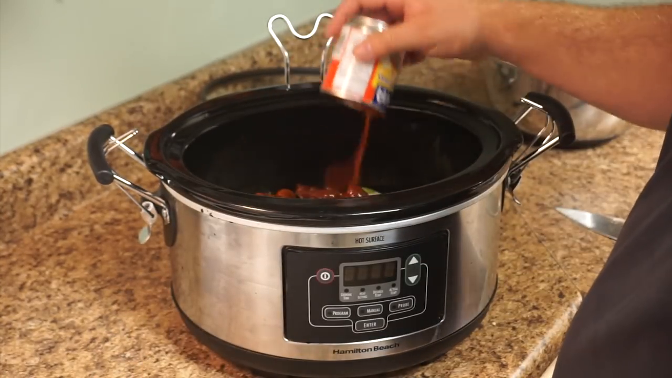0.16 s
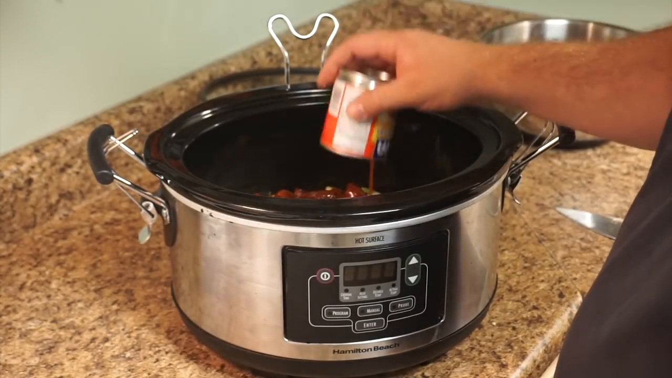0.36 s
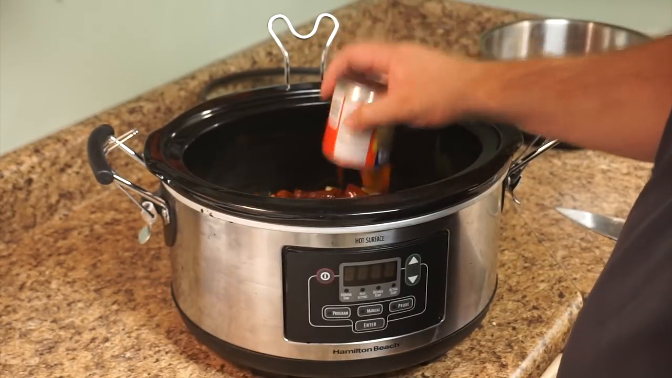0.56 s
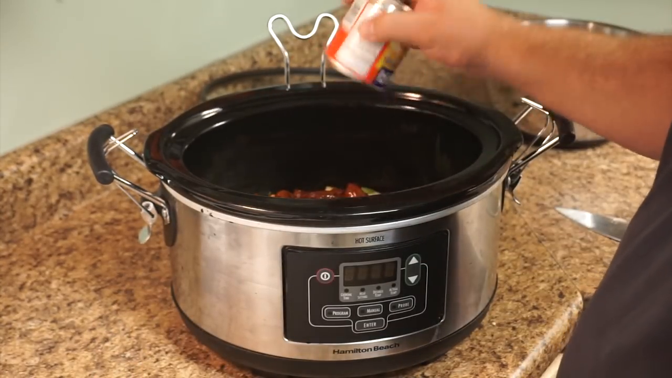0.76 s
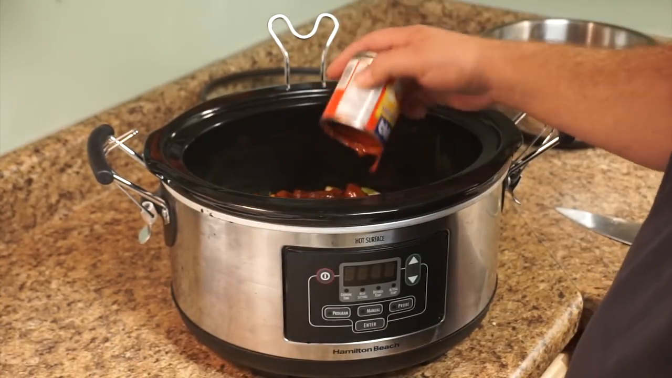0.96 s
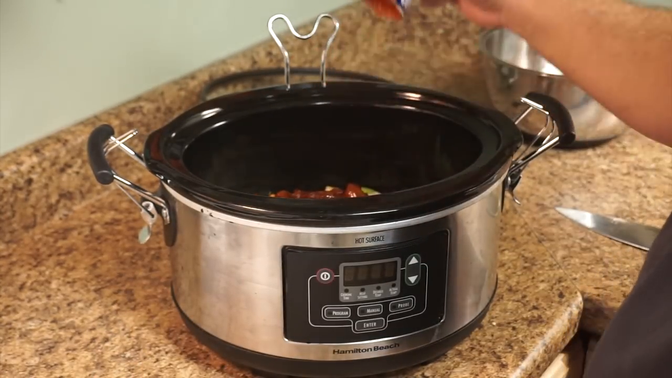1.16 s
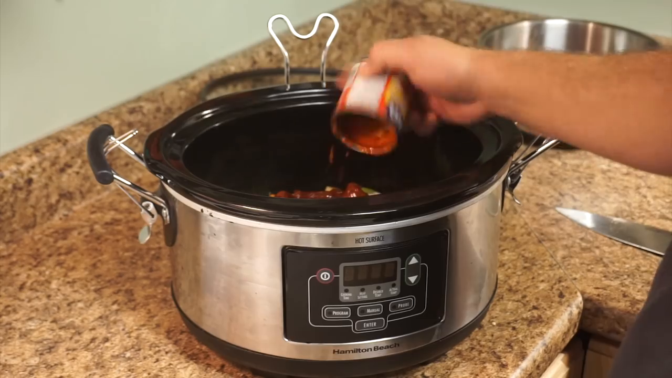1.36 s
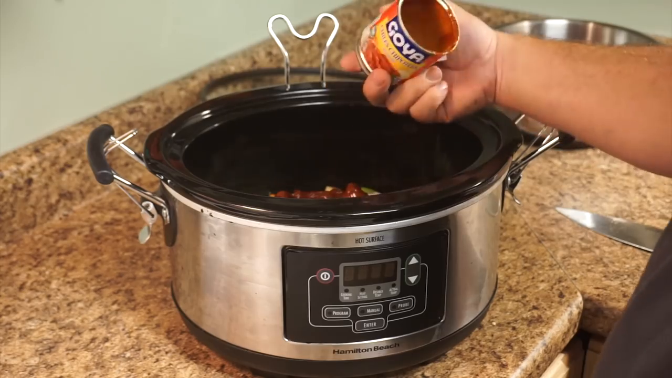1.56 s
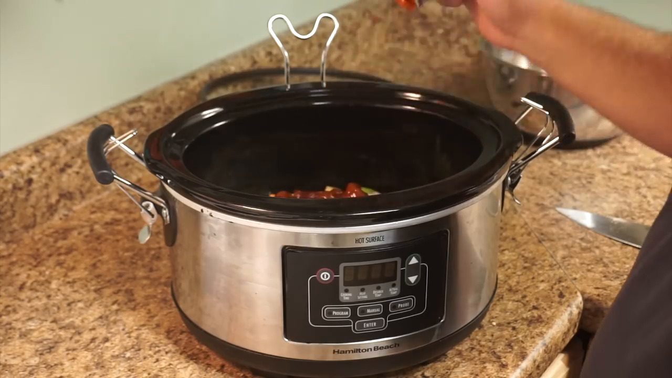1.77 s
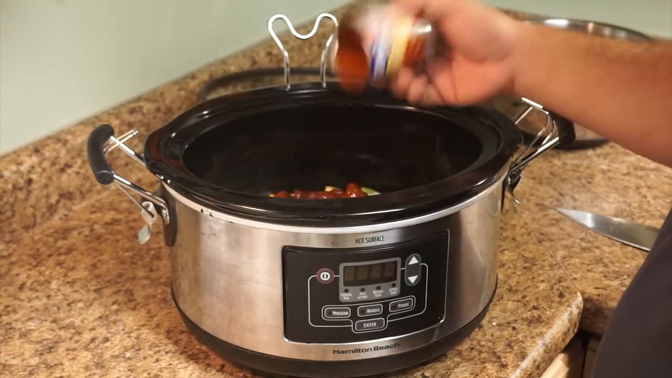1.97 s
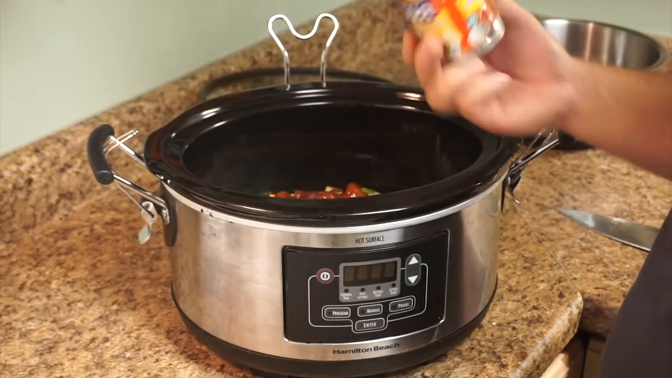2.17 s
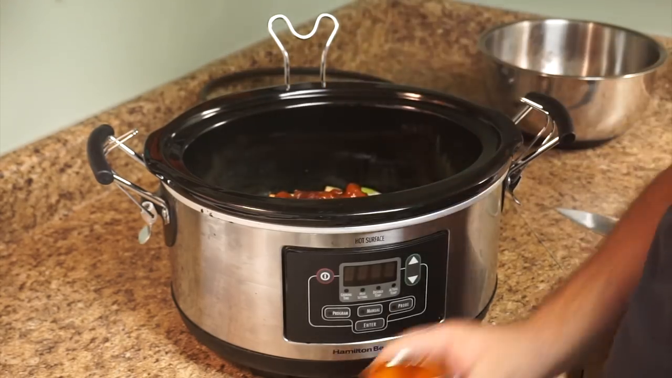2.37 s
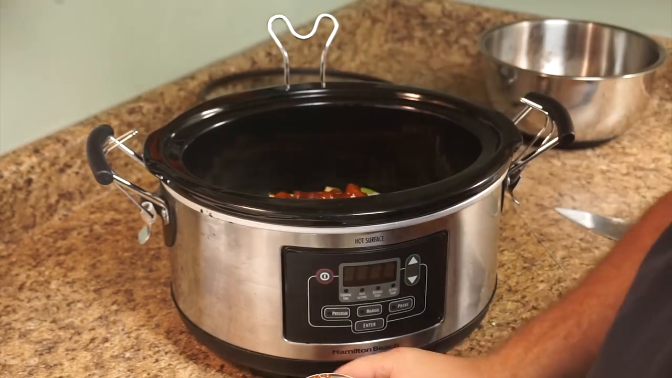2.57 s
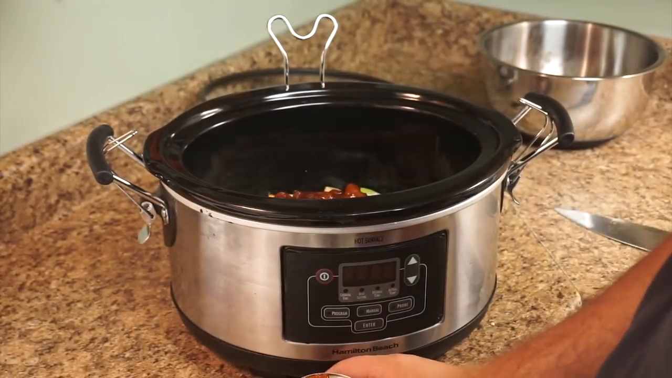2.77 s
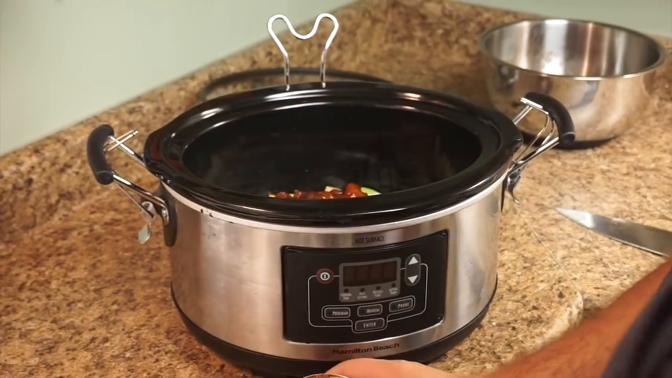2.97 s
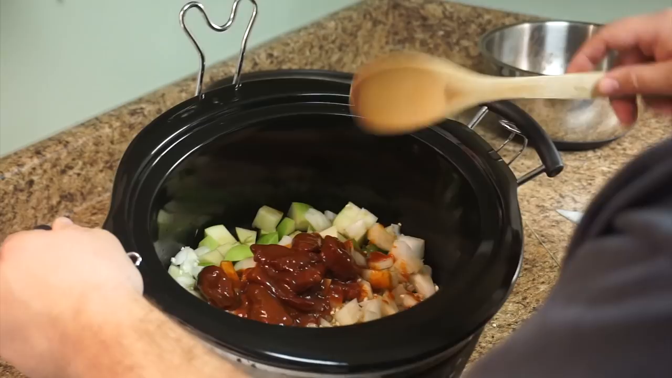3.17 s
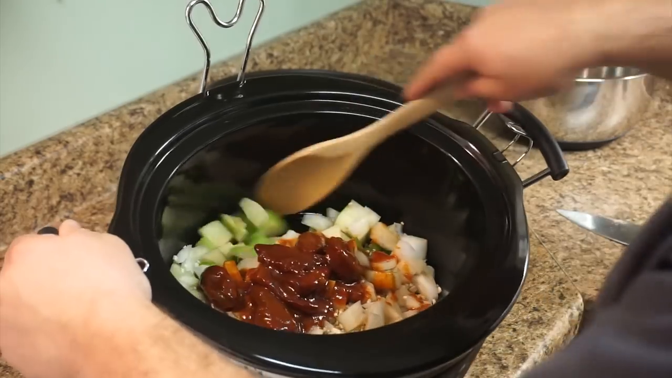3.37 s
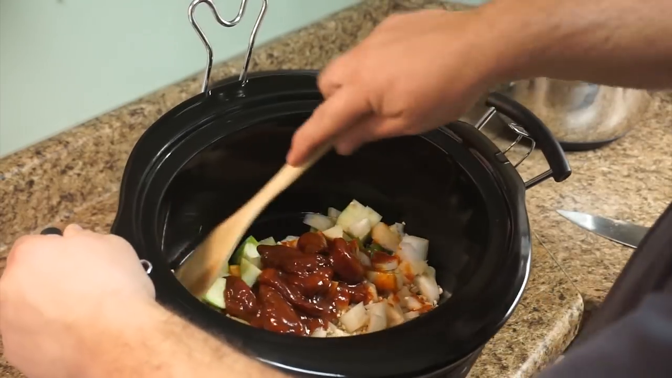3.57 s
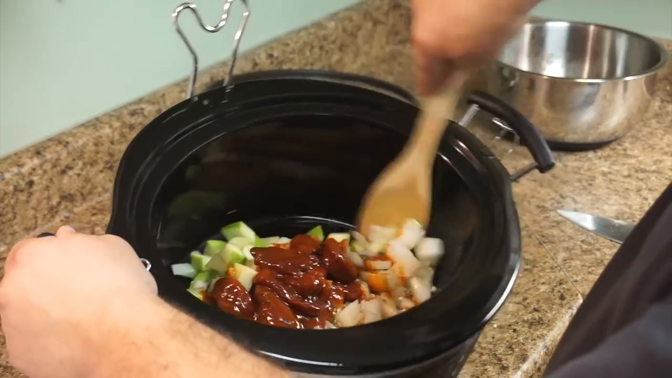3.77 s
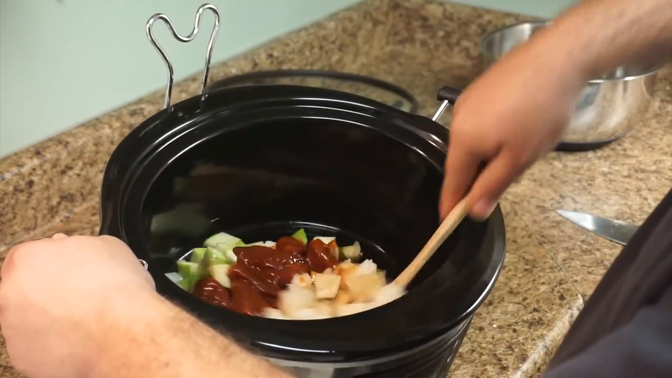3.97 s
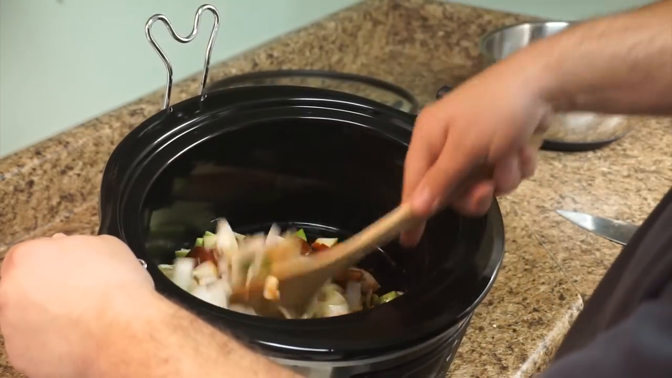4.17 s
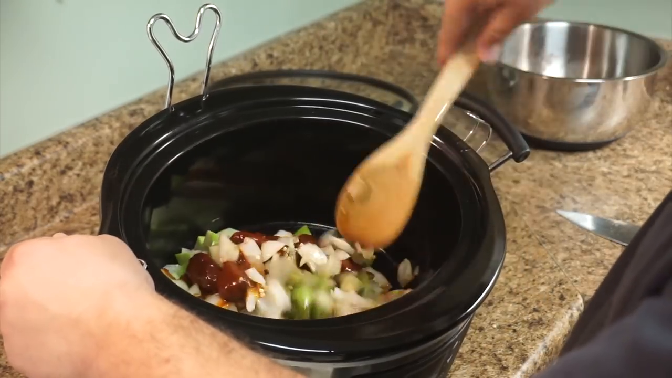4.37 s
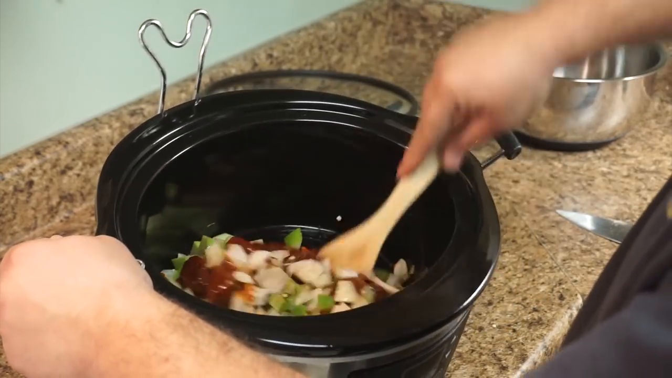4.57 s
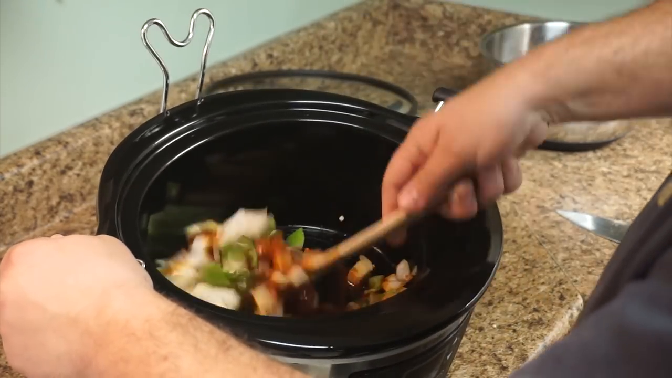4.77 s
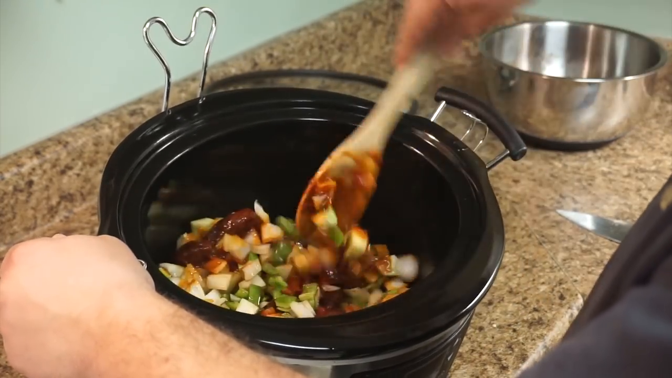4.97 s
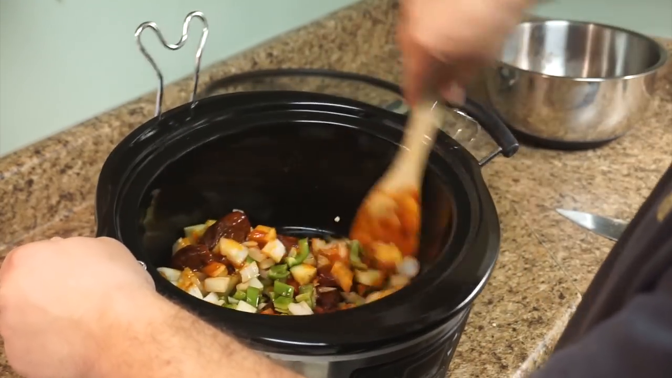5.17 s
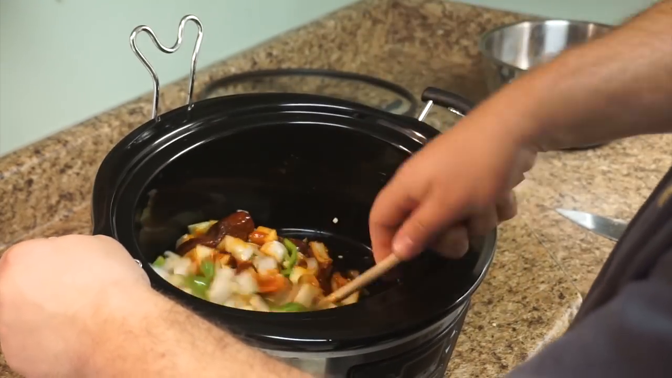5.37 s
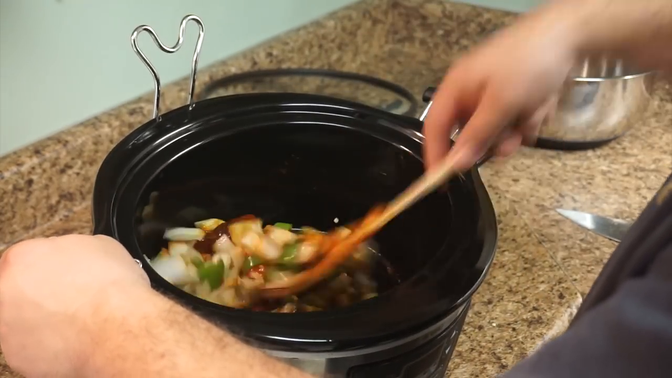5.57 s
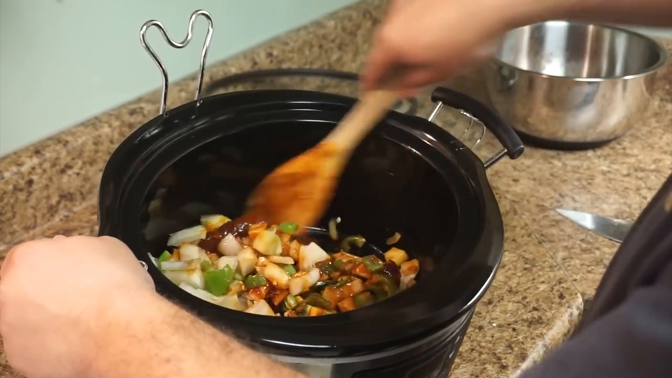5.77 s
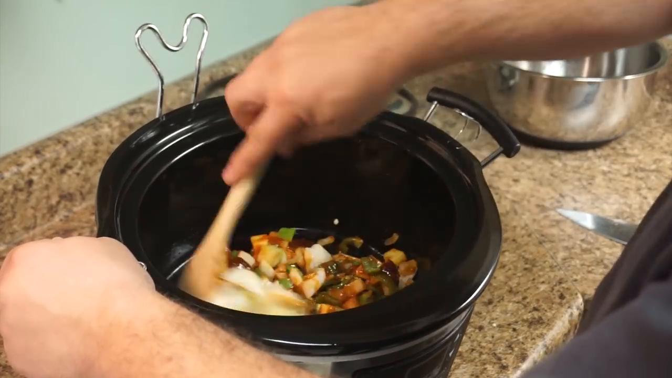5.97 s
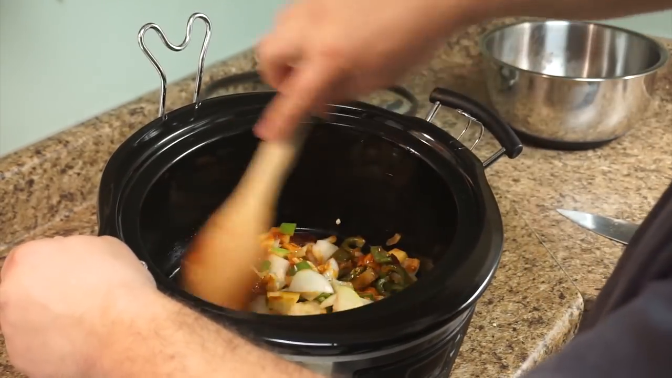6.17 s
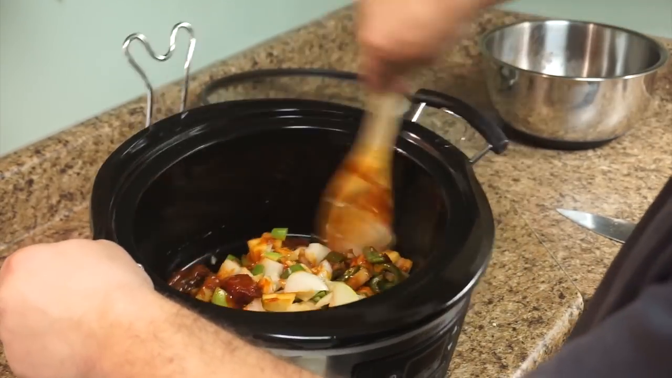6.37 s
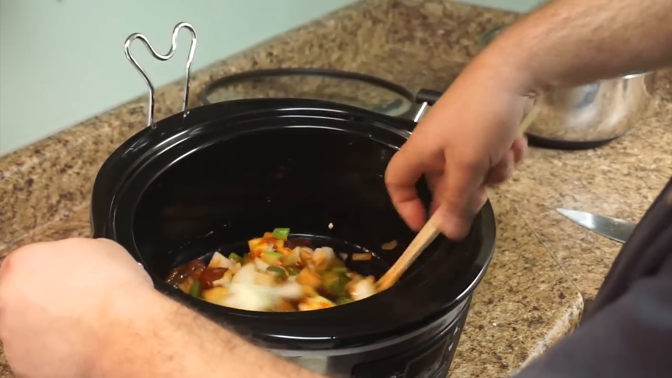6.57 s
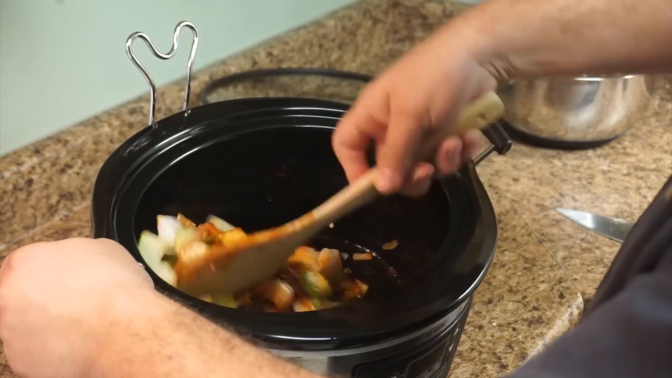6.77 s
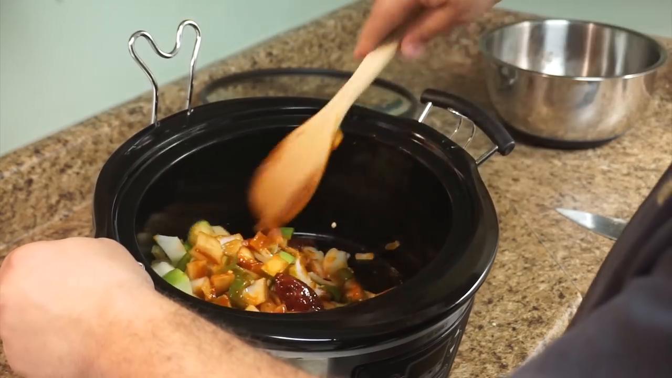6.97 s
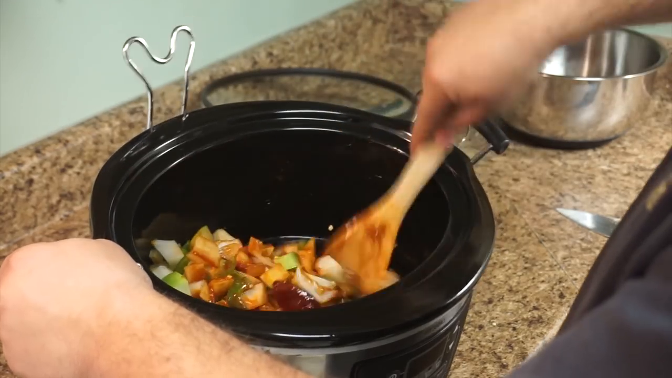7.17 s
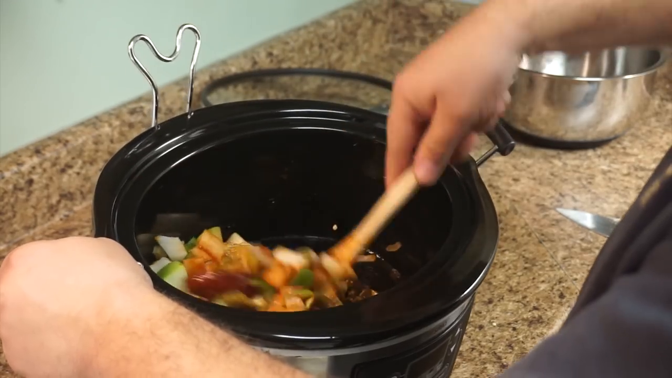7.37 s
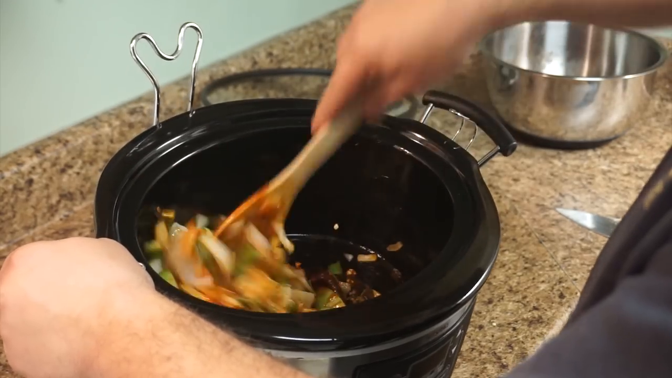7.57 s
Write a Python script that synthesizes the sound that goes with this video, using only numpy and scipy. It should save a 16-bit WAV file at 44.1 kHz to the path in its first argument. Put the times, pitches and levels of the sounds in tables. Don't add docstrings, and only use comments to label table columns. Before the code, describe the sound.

Soft rustles and a tin clank on a stone counter, then a wooden spoon knocks, scrapes and stirs wet vegetables in a stoneware pot.

```python
import sys
import numpy as np
from scipy import signal
from scipy.fft import rfft, irfft, next_fast_len
from scipy.io import wavfile
from scipy.ndimage import uniform_filter1d, map_coordinates

SR = 44100
rng = np.random.default_rng(int(sys.argv[2]) if len(sys.argv) > 2 else 0)


def digitize_waveform(pressure):
    field = np.atleast_2d(pressure).T
    bounded = np.clip(field, -1, 1)
    quanta = np.round(bounded * 32767).astype(np.int16)
    wavfile.write(sys.argv[1], SR, quanta)


def to_linear_factor(level_db):
    exponent = np.asarray(level_db, float) / 20
    return 10 ** exponent


N = 336483

# start in seconds, peak level in dB,
# pitch of the wood in Hz, pitch of the glaze in Hz, level of the bright edge in dB.
RIM_BLOWS = [
    (3.361, -16.5, 2350, 5630, -1),
    (3.855, -20.5, 1150, 4780, -1),
    (4.4582, -13.5, 1400, 5960, -1.5),
    (5.112, -12, 1670, 3900, -8.5),
    (5.742, -17.5, 2550, 3660, -2.5),
    (6.269, -6, 2050, 5480, -19),
    (6.4083, -10, 1670, 7060, -11.5),
    (7.0584, -11, 1420, 4600, -14),
]
# start in seconds, peak level in dB,
# pitch of the wood in Hz, level of the wood in dB, pitch of the glaze in Hz.
FLAT_BLOWS = [(3.666, -19.5, 1430, -5.5, 2580), (3.8334, -19.5, 1200, -17, 4480),
              (4.5084, -8, 1300, -14.5, 2790), (5.147, -12, 975, -14.5, 4100),
              (5.1866, -11, 1800, -4, 6780), (5.291, -23, 2420, -16, 2800),
              (5.306, -21.5, 2140, -9.5, 7400), (5.7947, -8.5, 910, -22, 4000),
              (6.0551, -22.5, 2050, -9.5, 5300), (6.3068, -15, 928, -13, 2900),
              (6.3222, -18.5, 1000, -22, 5800), (6.4588, -33, 2050, 3, 2470), (7.1357, -7, 1156, -19, 3760)]
# pitch in Hz, width in Hz, level in dB.
POT_MODES = [(940, 670, 12), (1300, 180, 9.5), (1710, 150, 3), (2050, 53, 5), (2546, 200, -0.5),
             (2680, 78, -2), (3890, 270, -1), (4480, 180, -0.5), (4780, 120, -0.5), (5300, 2200, -5),
             (6320, 520, -1.5), (7060, 370, -8), (8600, 120, -0.5), (10540, 420, -9.5)]
# share of that pitch, level in dB.
GLAZE_SPREAD = [(.55, -17.5), (.8, -2.5), (1.05, 2), (1.4, -5.5), (2.1, -8)]
# share of that pitch, level in dB.
WOOD_SPREAD = [(.4, -17), (.55, -9), (1.02, 2.5), (1.5, 3.5), (2.4, -7)]
# start in seconds, pitch in Hz, peak level in dB.
RIM_TONES = [(3.362, 6250, -34), (3.362, 9390, -36), (3.757, 3956, -33), (3.757, 5200, -34),
             (3.757, 8220, -34), (3.845, 6100, -28), (4.4581, 5000, -29), (4.4581, 5820, -26),
             (4.4581, 6700, -26), (4.4581, 10200, -31), (5.112, 3460, -24.5), (5.112, 4420, -27),
             (5.112, 5700, -33), (5.742, 3750, -26), (5.742, 6513, -31), (5.742, 12700, -28),
             (5.742, 13200, -33), (6.2692, 3750, -23), (6.2692, 4750, -25), (6.2692, 8400, -23),
             (6.4083, 6750, -27), (6.4083, 7300, -30), (6.4083, 10630, -34), (7.0584, 4330, -25),
             (7.0584, 4860, -30), (7.0584, 5600, -30), (7.0584, 6430, -21), (7.0584, 8540, -36)]
# start in seconds, pitch in Hz, peak level in dB.
FLAT_TONES = [(2.5277, 2035, -17), (2.5494, 1930, -22), (4.5084, 2000, -31), (4.5084, 2640, -22),
              (4.5084, 3240, -30), (4.5084, 5030, -28), (5.147, 2960, -34), (5.147, 4050, -25),
              (5.147, 4560, -28), (5.1866, 1300, -27), (5.1866, 1796, -25), (5.1866, 2220, -28),
              (5.1866, 4900, -22), (5.1866, 6900, -27), (5.7947, 4140, -24), (5.7947, 4640, -28),
              (5.7947, 8100, -27), (6.0551, 2020, -29.5), (6.0551, 3750, -34), (6.0551, 4590, -34),
              (6.3068, 1740, -29), (6.3068, 2110, -29), (6.3068, 3000, -30), (6.3222, 5120, -32),
              (6.3222, 5890, -31), (6.4588, 2080, -37), (6.4588, 2490, -37), (7.1357, 3730, -22),
              (7.1357, 4600, -25), (7.1357, 6230, -28)]
# start in seconds, pitch in Hz, peak level in dB.
DULL_TONES = [(3.666, 927, -21), (3.666, 1980, -17), (3.666, 2370, -20), (5.147, 620, -27),
              (5.147, 940, -24), (5.1866, 5300, -23), (5.1866, 6500, -22), (5.1866, 7100, -19),
              (6.3068, 620, -29), (6.3068, 904, -20), (7.1357, 760, -25), (4.5084, 800, -25),
              (5.7947, 3720, -21), (3.666, 1350, -24), (3.666, 3000, -24), (7.1357, 1000, -19),
              (7.1357, 1280, -20), (5.1866, 1550, -22), (5.1866, 2000, -21), (5.147, 1400, -25)]
# start in seconds, pitch in Hz, peak level in dB.
LONG_TONES = [
    (7.1357, 2690, -29),
    (7.0584, 3895, -23),
    (7.1357, 4770, -29),
    (7.0584, 6440, -30),
    (5.147, 2540, -27),
    (5.2, 2875, -34),
    (2.535, 4700, -33),
    (2.535, 2630, -31),
]
# start in seconds, peak level in dB, pitch in Hz.
CONTACT_SNAPS = [(3.6663, -15, 2100), (4.5084, -17, 1100), (5.1118, -12, 3900), (5.147, -12, 2800),
                 (5.7947, -14, 3800), (6.2692, -18, 4400), (6.3062, -12, 1500), (6.4083, -13, 6700),
                 (7.1355, -14, 1100), (3.8334, -17, 4500), (2.5277, -16, 7000)]
# start in seconds, level in dB, lower edge in Hz,
# level at 12 kHz in dB, time to fall by 60 dB in seconds.
SPOON_PLUNGES = [
    (3.362, -33, 5200, -11, 0.19),
    (4.458, -22, 3850, -4, 0.32),
    (5.112, -24.5, 1560, -8, 0.86),
    (5.743, -23, 2440, 6.5, 0.37),
    (6.268, -34, 3700, -13, .15),
    (6.409, -28, 5000, -14, 0.39),
    (7.059, -19, 3600, -13, 0.24),
]
# start in #
# seconds, peak level in dB, pitch in Hz.
BRIGHT_CRACKLES = [(.236, -52, 11000), (1.9, -50, 12000), (3.6492, -30, 7000), (3.6871, -27, 7000),
                   (3.8328, -22, 6000), (3.8482, -22, 6500), (4.5661, -32, 7000), (5.0984, -36, 8000),
                   (5.2914, -26, 8000), (6.3241, -24, 6000), (6.3954, -32, 8000), (6.7606, -40, 8000),
                   (6.85, -42, 7000), (6.9472, -42, 6500), (6.9971, -46, 8000), (7.255, -36, 8000),
                   (7.555, -40, 7000)]
# start in seconds, level in dB, pitch in Hz, length in seconds.
SQUEAKS = [
    (2.66, -54, 8400, 0.03),
    (2.698, -56, 6500, .09),
    (2.735, -55, 8400, 0.032),
    (3.834, -25, 1150, 0.026),
    (7.06, -37.5, 1450, 0.025),
]
# start in seconds, length in seconds, level in dB,
# first pitch in Hz, last pitch in Hz.
DRAG_CHATTER = [(2.665, .09, -44, 1300, 1120), (2.7, .075, -56, 370, 355), (2.68, .06, -50, 750, 600),
                (2.535, .02, -48, 560, 560), (3.795, .025, -38, 2000, 3100), (5.205, .05, -42, 2750, 2900),
                (6.27, .008, -36, 1350, 1350), (6.308, .018, -35, 1350, 1500), (6.31, .02, -38, 2390, 2200),
                (6.41, .03, -40, 1400, 1700), (6.462, .07, -43, 2500, 2450), (6.495, .06, -41, 3050, 2850),
                (6.525, .085, -41, 1950, 2450), (6.5, .07, -41, 3500, 4300), (6.56, .065, -40, 3250, 3050),
                (7.062, .04, -33, 6500, 6450), (7.098, .02, -42, 2050, 1700), (7.136, .004, -28, 850, 950),
                (3.15, .035, -42, 1150, 1100), (5.149, .022, -30, 2560, 2560)]
# start in seconds, length in seconds, rub level in dB,
# rub pitch in Hz, wet fizz compared with the rub in dB.
SPOON_STROKES = [(3.25, 0.067, -44, 3000, 2), (3.4, .1, -40, 4400, 1), (3.52, 0.078, -40, 4300, 3.5),
                 (3.66, .008, -33.5, 5500, 0), (3.671, 0.031, -33.5, 3000, 5),
                 (3.753, 0.055, -29.5, 4770, 3), (3.841, 0.029, -25, 4850, -0.7),
                 (3.958, 0.081, -35, 3500, 0.7), (4.065, 0.07, -38.5, 3900, -1),
                 (4.168, .27, -41.5, 3300, -2.5), (4.565, .11, -34, 3520, -2.5),
                 (4.7, 0.067, -43.5, 3200, 1), (4.815, 0.34, -40.5, 2600, -7), (5.224, .17, -35, 2940, 0),
                 (5.447, 0.4, -41.5, 2950, -5.5), (5.838, 0.041, -35.5, 3800, -0.5),
                 (5.896, 0.17, -36, 4400, 0.5), (6.07, 0.051, -41, 3750, 1.5), (6.146, .1, -43, 3000, -8),
                 (6.354, 0.16, -39, 3550, 0), (6.497, 0.12, -44, 4300, -6), (6.64, 0.16, -50.5, 3100, -1),
                 (6.758, 0.11, -55, 3120, 11), (6.925, 0.03, -57, 3100, 6.5),
                 (7.0, 0.043, -57.5, 3100, 7.5), (7.161, .12, -38, 4200, 0.5), (7.33, .16, -55.5, 3040, 4),
                 (7.507, .13, -49, 3400, 4)]
# start in seconds, length in seconds, level in dB,
# first pitch in Hz, last pitch in Hz.
BARE_WALL_SCRAPE = (6.49, .14, -38, 2900, 3800)
# attack in seconds, sag in dB a second, release in dB a second.
SPOON_SWELL = (0.029, 14.5, 257)
# frequency in Hz, level in dB.
RUB_COLOUR = [(1200, -19.5), (2000, 1), (3000, -2.5), (4500, 0.5), (6000, -2), (8000, -10)]
# frequency in Hz, level in dB.
DRAG_COLOUR = [(300, -12.5), (600, -8.5), (1000, 2), (1800, 1), (2600, -4.5)]
# frequency in Hz, level in dB.
FIZZ_COLOUR = [(4000, -50), (6000, -5.5), (8500, -3.5), (12000, -5), (16000, -8)]
# start in seconds, length in seconds, rub level in dB,
# dull drag compared with the rub in dB, bright rustle compared with the rub in dB.
HAND_MOVES = [(0, 0.1, -61, 6, 1), (.22, 0.29, -63.5, 7, -3), (.52, 0.13, -59.5, 9, -8),
              (.71, 0.22, -47.5, -1, -21), (.93, .15, -45.5, -9, -12), (1.12, 0.25, -46, -4.5, -13.5),
              (1.35, 0.12, -43.5, -7, -12.5), (1.519, 0.096, -45, -12, -5.5), (1.657, 0.36, -49, -1.7, -9),
              (1.992, 0.062, -46.5, 8, -5), (2.105, 0.15, -45, -1.5, -8), (2.304, 0.054, -42, 2, -7.5),
              (2.38, 0.11, -42.5, -4, -10), (2.521, 0.18, -42, 1, -3.5), (2.694, 0.053, -48, 6, -5.5),
              (2.797, 0.048, -40.5, -9, -5), (2.9, 0.17, -52, 3, -1.5), (3.143, 0.025, -36, 3, -5)]
# attack in seconds, sag in dB a second, release in dB a second.
HAND_SWELL = (0.035, 2.4, 220)
# frequency in Hz, level in dB.
SLEEVE_COLOUR = [(1300, -6), (1900, -4), (2500, -2.5), (3500, -3.5), (4800, -7.5), (6500, -17.5)]
# frequency in Hz, level in dB.
RUSTLE_COLOUR = [(4500, -8.5), (6500, 0), (9000, -2.5), (12000, -8), (16000, -10)]
# pitch in Hz, width in Hz, level in dB.
TIN_MOUTH_MODES = [(1800, 160, -2.5), (2520, 140, -0.5), (4360, 500, 3)]
# start in seconds, peak level in dB.
TIN_LANDINGS = [
    (2.5277, -15),
    (2.5494, -19.5),
]
# pitch in Hz, width in Hz, level in dB.
TIN_MODES = [(1130, 84, -18.5), (1720, 60, -10), (2020, 95, 0), (2170, 260, -6.5), (3120, 630, -17.5),
             (3900, 300, -18.5), (4710, 200, -22)]
# start in seconds, peak level at 2.5-7 kHz in dB,
# low level in dB, edge level in dB.
SMALL_TICKS = [(0.0694, -50, -5, 7), (0.235, -50.5, -5, 5), (0.5994, -58, -9.5, 8), (0.624, -48, -9, 6),
               (1.8994, -44, 2, -16), (2.304, -46, 1, -19), (2.3598, -38.5, -1, -7),
               (2.3992, -38.5, 4, -29), (2.6964, -41, 10, -15), (2.8218, -33.5, 1, -6),
               (3.327, -28.5, 1.5, -34.5), (3.343, -25.5, -9, -30), (3.739, -35.5, -24, 9),
               (3.76, -29, -4, 8), (3.897, -27, -9, 1.5), (4.0894, -41.5, -11, 16), (4.352, -41, -1, 6.5),
               (4.6424, -27.5, -19, -12), (4.836, -38.5, -14, 1), (4.945, -50, -14, 6),
               (5.045, -46, -14, 8), (5.492, -39, -14, 2), (5.5079, -31, -14, 4), (5.857, -29, -1.5, 7),
               (6.6831, -33, -3, 2.5), (6.722, -48, -14, 14), (6.804, -35.5, -4, -5), (7.216, -26, -28, -3),
               (7.32, -36.5, -19, 2), (7.5013, -49, -13, -8)]
# start in seconds, peak level in dB, pitch in Hz.
COUNTER_THUMPS = [
    (2.009, -51, 501),
    (2.04, -54, 460),
    (2.303, -43, 519),
    (2.7, -45, 398),
    (2.739, -46, 370),
    (2.82, -43, 271),
    (3.169, -52, 243),
]
# start in seconds, peak level in dB, pitch in Hz.
CAMERA_BUMPS = [
    (4.509, -70, 60),
    (5.172, -50, 62),
    (6.305, -57, 55),
    (6.795, -64, 55),
    (7.055, -62, 55),
    (7.139, -64, 60),
]
# frequency in Hz, level in dB.
AIR_COLOUR = [(15, -81), (25, -42.5), (208, -17), (232, -13.5), (313, -19), (378, -11), (553, -9),
              (617, -4.5), (979, -17), (1180, -8), (2680, -8.5), (2950, -11.5), (8370, -26), (15200, -59),
              (16500, -56)]
# pitch in Hz, width in Hz, level in dB.
KITCHEN_MODES = [(478.6, 22, 0), (597, 42, -5), (688.4, 19.4, 4), (954, 92, 10), (1720, 80, -22),
                 (1836, 81, -3), (2317, 31, -2.5), (2540, 53, -7)]
# pitch in Hz, level in dB, change in dB a second.
MOTOR_HUM = [(240.2, -66, -0.09), (8160, -73, -0.7)]
# frequency in Hz, likeness from 0 to 1.
LEFT_RIGHT_LIKENESS = [(25, .4), (70, 0.79), (180, 0.93), (550, 0.94), (1650, 0.75), (4970, 0.51),
                       (15000, 0.19)]
# time in seconds, level in dB.
SCENE_CHANGE = [
    (0, 0.5),
    (3.2, 2.5),
    (3.222, 0.5),
    (3.24, -96),
    (3.258, -45),
    (3.285, -22),
    (3.32, -14),
    (3.34, -8),
    (3.358, 1),
]


def unit(x):
    return x / np.sqrt(np.mean(x ** 2) + 1e-20)


def along(points, hz):
    f, v = np.transpose(points)
    return np.interp(np.log(hz + 1), np.log(f + 1), v)


def wobble(rate):
    knots = rng.standard_normal(int(N * rate / SR) + 4)
    return map_coordinates(knots, [np.arange(N) * rate / SR])


def fall(t, t60):
    return to_linear_factor(-60 * t / t60)


def rise(t, seconds):
    return 1 - np.exp(-t / seconds)


def peaks(modes, hz):
    return np.sqrt(sum(to_linear_factor(2 * db) / (1 + (2 * (hz - c) / w) ** 2) ** 2 for c, w, db in modes))


def colour(spectrum):
    below, above = (spectrum[0][0] / 2, -120), (spectrum[-1][0] * 2, -120)
    closed = [below] + list(spectrum) + [above]
    return lambda hz: to_linear_factor(along(closed, hz) - 46 * (hz > 15800))


def scaled(spread, centre_hz):
    return [(share * centre_hz, level) for share, level in spread]


def stereo(pair, gain):
    size = pair.shape[1]
    hz = np.fft.rfftfreq(size, 1 / SR)
    turn = np.arccos(np.clip(along(LEFT_RIGHT_LIKENESS, hz), -1, 1)) / 2
    mid, side = irfft(rfft(pair) * gain(hz) * [np.cos(turn), np.sin(turn)], size)
    return unit(np.array([mid + side, mid - side]))


def noise(t, gain):
    return stereo(rng.standard_normal((2, len(t))), gain)


def blank(parts):
    return np.zeros((2, N + SR)), np.arange(SR // parts) / SR


def add(out, s, x):
    out[:, round(s * SR):][:, :x.shape[1]] += x


def burst(t, bands, levels_db, shape, snap, crack_t60, room_t60, room_db):
    out = 0
    for band, db, longer in zip(bands, levels_db, (1.2, 1.01, 0.8)):
        dying = fall(t, crack_t60 * longer) + to_linear_factor(room_db) * fall(t, room_t60 * longer)
        gain = lambda hz: colour(band)(hz) * shape(hz)
        click = irfft(gain(np.fft.rfftfreq(len(t), 1 / SR)), len(t))
        click = np.roll(click, shift=8)
        click = click / click.max() * fall(t, 0.02)
        out = out + to_linear_factor(db) * (dying * noise(t, gain) + snap * longer ** 2 * click)
    return out * rise(t, 0.0001)


def ring(t, modes, t60):
    return noise(t, lambda hz: peaks(modes, hz)) * fall(t, t60) * rise(t, 0.00023)


def grainy(per_s, depth, patchy_db):
    size = next_fast_len(N + 512)
    strength = np.minimum(rng.exponential(size=size), 3)
    hits = (rng.random(size) < per_s / SR) * depth * strength
    grain = signal.fftconvolve(hits, fall(np.arange(512) / SR, 0.012))[:size]
    z = signal.stft(rng.standard_normal((2, size)) * (1 + grain), nperseg=256)[2]
    field = uniform_filter1d(rng.standard_normal(z.shape[1:]), size=6, axis=0)
    field = uniform_filter1d(field, size=12, axis=1)
    return signal.istft(z * to_linear_factor(patchy_db * unit(field)), nperseg=256)[1][:, :size]


def friction(moves, swell_shape, bands, per_s, depth, patchy_db, body, through):
    pair = stereo(grainy(per_s, depth, patchy_db), lambda f: 1 + through * peaks(body, f))
    hz, t, z = signal.stft(pair, SR, nperseg=256)
    rub, drag, fizz = [colour(band)(hz) for band in bands]
    attack_s, sag_db, release_db = swell_shape
    power = 0
    for s, length, rub_db, rub_hz, focus_db, drag_db, fizz_db in moves:
        near = np.exp(-(np.log((hz + 1) / rub_hz) / 0.3) ** 2)
        layers = zip((rub * to_linear_factor(focus_db * near), drag, fizz), (rub_db, drag_db, fizz_db))
        tone = sum(unit(gain) ** 2 * to_linear_factor(2 * db) for gain, db in layers)
        sag = sag_db * np.clip(t - s, 0, length)
        release = release_db * np.maximum(t - s - length, 0)
        swell = np.clip((t - s) / attack_s + 1, 0, 1) * to_linear_factor(-sag - release)
        power = power + np.outer(tone, swell ** 2)
    return signal.istft(z * np.sqrt(power), SR, nperseg=256)[1][:, :N] * to_linear_factor(1.03 * wobble(25))


def blows():
    rim = [(s, db, wood_hz, -22.5, glaze_hz, edge_db) for s, db, wood_hz, glaze_hz, edge_db in RIM_BLOWS]
    return rim + [(*row, -12.5) for row in FLAT_BLOWS]


def spoon_knocks():
    out, t = blank(4)
    for s, db, wood_hz, wood_db, glaze_hz, edge_db in blows():
        bands = [scaled(WOOD_SPREAD, wood_hz), scaled(GLAZE_SPREAD, glaze_hz), FIZZ_COLOUR]
        low_cut = [(0.45 * wood_hz, -11), (wood_hz, 0)]
        modes = [(hz, width, level + along(low_cut, hz) + 1.4 * rng.standard_normal())
                 for hz, width, level in POT_MODES]
        blow = burst(t, bands, (wood_db - 2, -8, edge_db - 1), lambda hz: 0.5 + peaks(modes, hz),
                     snap=1.96, crack_t60=0.025, room_t60=0.18, room_db=-5.5)
        wood = to_linear_factor(wood_db - 4) * np.sin(2 * np.pi * wood_hz * t) * fall(t, 0.072)
        glaze = to_linear_factor(-15) * ring(t, [(glaze_hz, 160, 0)], t60=0.09)
        tilt = [(wood_hz, wood_db), (4000, 0), (10000, edge_db)]
        wall_modes = [(hz, 0.38 * width, level + along(tilt, hz)) for hz, width, level in modes]
        wall = to_linear_factor(-15) * ring(t, wall_modes, t60=0.15)
        add(out, s, to_linear_factor(db) * (blow + wood + glaze + wall))
    return out[:, :N]


def struck_tones():
    out, t = blank(4)
    for table, t60 in ((RIM_TONES, 0.12), (FLAT_TONES, 0.093), (DULL_TONES, 0.025), (LONG_TONES, 0.22)):
        chance = rng.standard_normal((len(table), 4))
        for (s, hz, db), (beat, lean, left, right) in zip(table, chance):
            phase = 2 * np.pi * hz * t + 0.35 * np.array([[left], [right]])
            pair = np.sin(phase) + 0.5 * np.sin(phase + 2 * np.pi * 45 * beat * t)
            level = to_linear_factor(db + 1.2 * lean * np.array([[1], [-1]]))
            add(out, s, level * pair * fall(t, t60) * rise(t, 0.0006))
    return out[:, :N]


def snaps():
    out, t = blank(50)
    for s, db, hz in CONTACT_SNAPS:
        pulse = np.sin(2 * np.pi * hz * t) * np.exp(-((t * hz - 1) / 0.75) ** 2)
        add(out, s, to_linear_factor(db) * pulse * np.ones((2, 1)))
    return out[:, :N]


def plunges():
    out, t = blank(3)
    for s, db, edge_hz, top_db, t60 in SPOON_PLUNGES:
        rasp = colour([(0.76 * edge_hz, -20), (edge_hz, 0), (7000, -1.5), (12000, top_db),
                       (16000, top_db - 5)])
        wet = noise(t, lambda hz: rasp(hz) * (2.3 + peaks(POT_MODES, hz)))
        add(out, s, to_linear_factor(db) * wet * fall(t, t60) * rise(t, 0.0011))
    return out[:, :N]


def wall_scrape(count=5):
    s, length, db, first_hz, last_hz = BARE_WALL_SCRAPE
    step_s, step_hz = length / count, (last_hz - first_hz) / (count - 1)
    return [(s + k * step_s, step_s, db, first_hz + k * step_hz, 11.5, db - 15.5, db - 6)
            for k in range(count)]


def stirring():
    moves = wall_scrape()
    for s, length, db, hz, wet_db in SPOON_STROKES:
        octaves = np.log2(hz / 3000)
        drag_db = -47 + 0.63 * (db + 40) - 5 * octaves
        focus_db = 6.5 - 9.5 * octaves
        moves.append((s, length, db, hz, focus_db, drag_db, db + wet_db))
    return friction(moves, SPOON_SWELL, (RUB_COLOUR, DRAG_COLOUR, FIZZ_COLOUR),
                    per_s=350, depth=0.5, patchy_db=2.5, body=POT_MODES, through=0.13)


def chatter():
    out, t = blank(6)
    for s, length, db, first_hz, last_hz in DRAG_CHATTER:
        hz = first_hz + (last_hz - first_hz) * np.clip(t / length, 0, 1)
        spread = [(0, 0.14 * first_hz, 0)]
        size, turn = [noise(t, lambda f: peaks(spread, f)) for _ in range(2)]
        tone = np.real((0.4 + size + 1j * turn) * np.exp(2j * np.pi * np.cumsum(hz) / SR))
        add(out, s, to_linear_factor(db) * tone * fall(np.maximum(t - length, 0), 0.06) * rise(t, 0.003))
    return out[:, :N]


def skids():
    out, t = blank(8)
    for s, db, hz, length in SQUEAKS:
        held = fall(np.maximum(t - length, 0), 0.12) * rise(t, 0.002)
        rough = noise(t, lambda f: peaks([(hz, 150, 0)], f))
        tone = 0.69 * np.sin(2 * np.pi * hz * t) + 0.5 * rough
        add(out, s, to_linear_factor(db) * held * tone)
    return out[:, :N]


def crackles():
    out, t = blank(20)
    for s, db, hz in BRIGHT_CRACKLES:
        spit = noise(t, colour(scaled(WOOD_SPREAD, hz)))
        add(out, s, to_linear_factor(db - 6) * spit * fall(t, 0.04))
    return out[:, :N]


def tin():
    out, t = blank(3)
    for s, db in TIN_LANDINGS:
        clatter = burst(t, (DRAG_COLOUR, RUB_COLOUR, FIZZ_COLOUR), (-9, -6, -19), np.ones_like,
                        snap=0.53, crack_t60=0.029, room_t60=0.3, room_db=-8.5)
        metal = to_linear_factor(5) * ring(t, TIN_MODES, t60=0.12)
        add(out, s, to_linear_factor(db) * (metal + clatter) * rise(t, 0.0012))
    return out[:, :N] * to_linear_factor([[-1.8], [1.8]])


def hands():
    moves = [(s, length, db, 2320, -2.5 - 0.57 * bright_db, db + dull_db, db + bright_db)
             for s, length, db, dull_db, bright_db in HAND_MOVES]
    return friction(moves, HAND_SWELL, (SLEEVE_COLOUR, DRAG_COLOUR, RUSTLE_COLOUR),
                    per_s=150, depth=0.15, patchy_db=1.5, body=TIN_MOUTH_MODES, through=0.42)


def ticks():
    out, t = blank(6)
    for s, db, low_db, edge_db in SMALL_TICKS:
        touch = burst(t, (DRAG_COLOUR, RUB_COLOUR, FIZZ_COLOUR), (low_db - 0.5, 0.1, edge_db),
                      np.ones_like, snap=0.6, crack_t60=0.041, room_t60=0.27, room_db=-1.5)
        add(out, s, to_linear_factor(db - 10.5) * touch)
    return out[:, :N]


def thumps():
    out, t = blank(6)
    for s, db, hz in COUNTER_THUMPS + CAMERA_BUMPS:
        thud = np.sin(2 * np.pi * hz * t) * rng.uniform(0.53, 1.25, (2, 1))
        add(out, s, to_linear_factor(db + 1.5) * thud * fall(t, 0.1) * rise(t, 0.003))
    return out[:, :N]


def kitchen():
    t = np.arange(N) / SR
    air = lambda hz: colour(AIR_COLOUR)(hz) * (1 + 1.47 * peaks(KITCHEN_MODES, hz))
    out = to_linear_factor(-47.5) * stereo(grainy(0, 0, patchy_db=0.67), air)[:, :N]
    hiss_colour = colour([(3000, -12), (8000, -6), (16000, -2)])
    hiss = stereo(rng.standard_normal((2, next_fast_len(N))), hiss_colour)
    out = out + to_linear_factor(-68) * hiss[:, :N]
    for hz, db, fade_db in MOTOR_HUM:
        phase = 2 * np.pi * hz * t + 0.08 * wobble(6)
        out = out + to_linear_factor(db + 2 + fade_db * t + 0.8 * wobble(5.2)) * np.sin(phase)
    return out


def scene():
    small = spoon_knocks() + struck_tones() + snaps() + plunges() + crackles() + skids() + tin() + ticks()
    no_bass = signal.butter(4, 520, "high", fs=SR, output="sos")
    small = signal.sosfilt(no_bass, small)
    rubbing = to_linear_factor(-2.5) * (stirring() + hands())
    return (small + thumps() + chatter() + rubbing + kitchen()) * to_linear_factor([[0.6], [-0.6]])


def low_pass(x):
    return signal.sosfilt(signal.butter(12, 16840, fs=SR, output="sos"), x)


def record(dry):
    memory = np.exp(-1 / (0.03 * SR))
    power = signal.lfilter([1 - memory], [1, -memory], np.mean(dry ** 2, axis=0))
    over_db = np.maximum(10 * np.log10(power + 1e-12) + 36, 0)
    change_s, change_db = np.transpose(SCENE_CHANGE)
    fade_db = np.interp(np.arange(N) / SR, change_s, change_db)
    size = next_fast_len(N)
    spectrum = rfft(dry * to_linear_factor(-0.3 * over_db + fade_db), size)
    spectrum = spectrum * (np.fft.rfftfreq(size, 1 / SR) < 16840)
    return low_pass(irfft(spectrum, size)[:, :N])


dry = scene()
out = record(dry)
digitize_waveform(out)
```